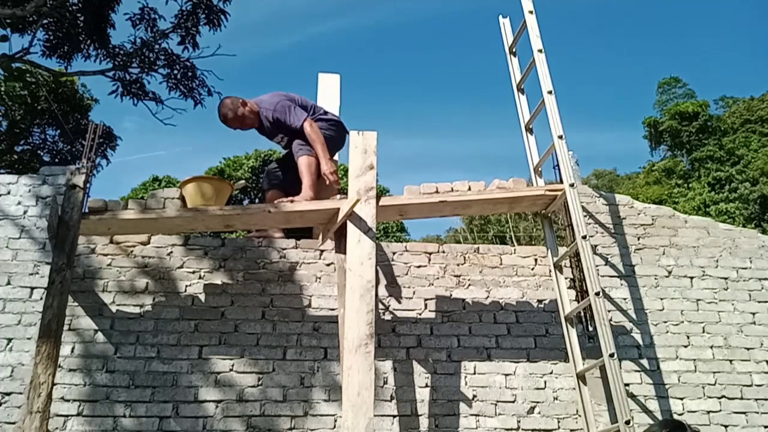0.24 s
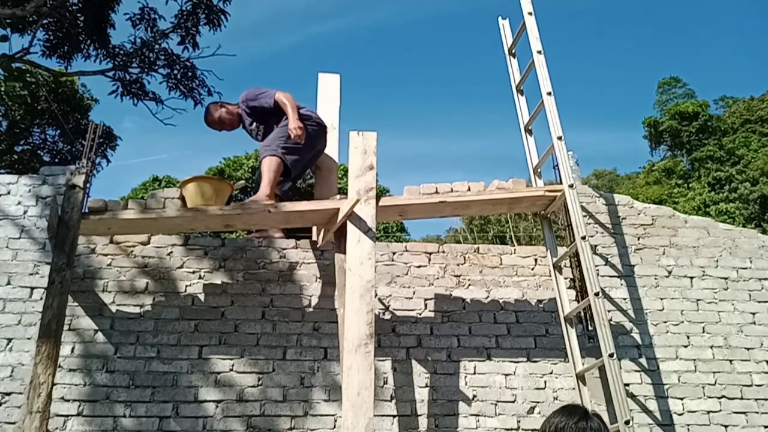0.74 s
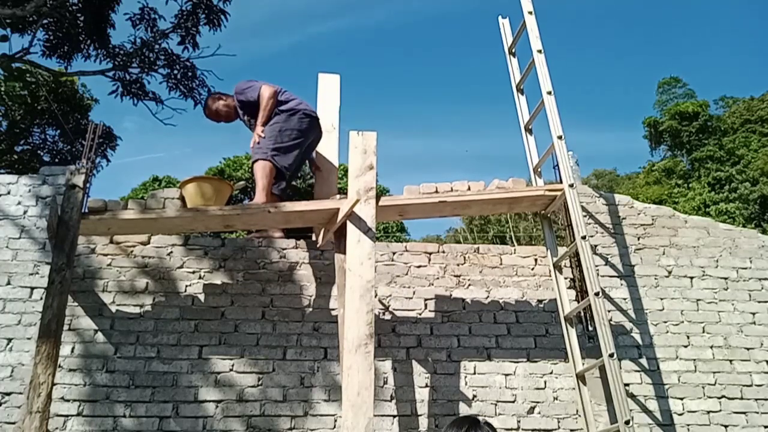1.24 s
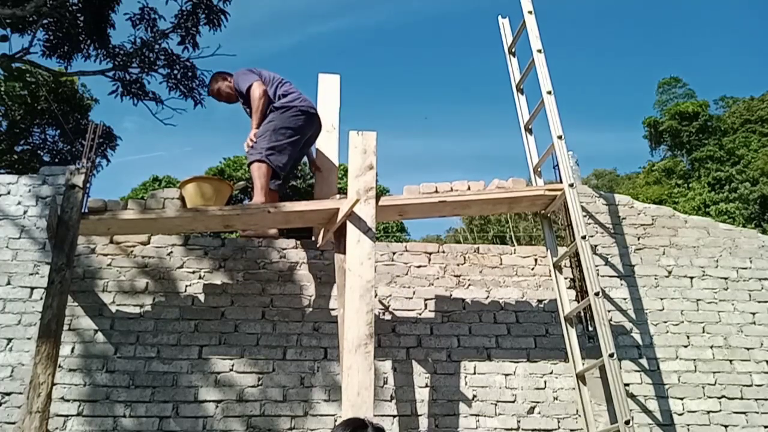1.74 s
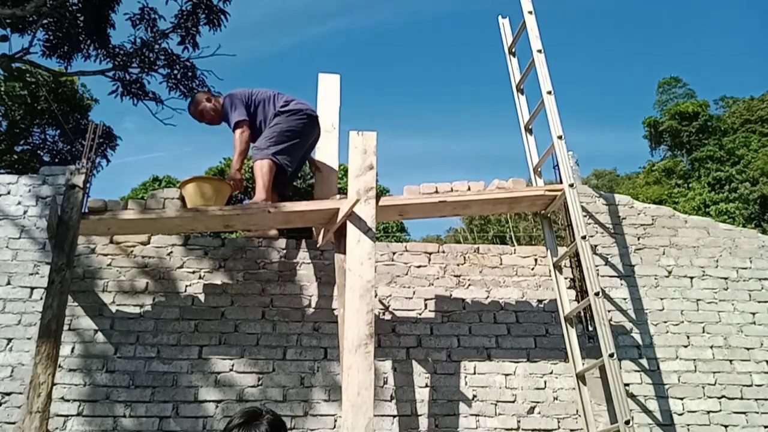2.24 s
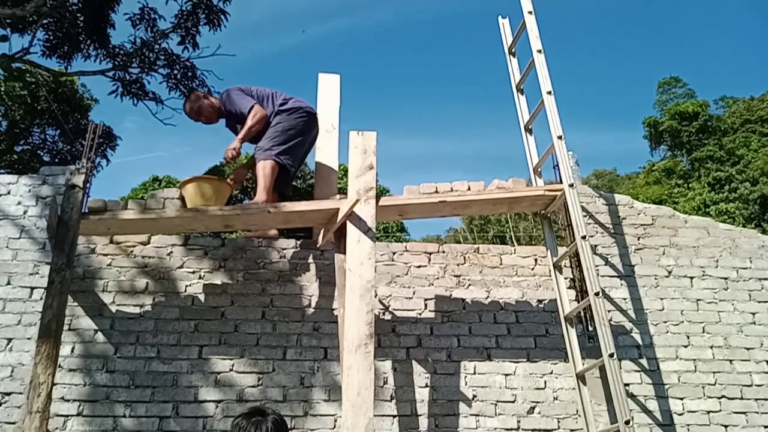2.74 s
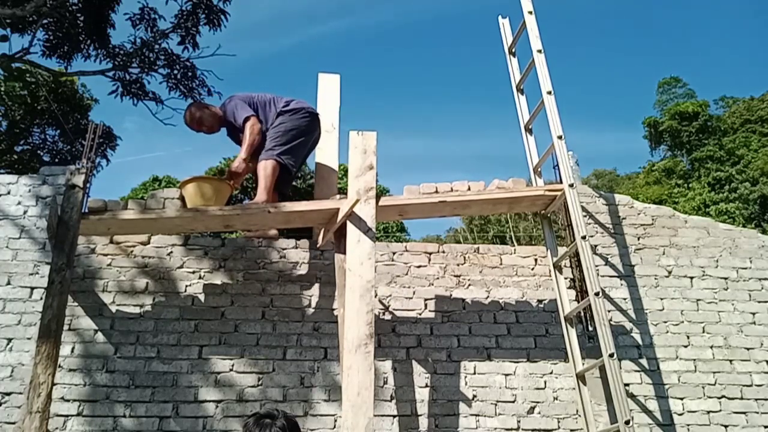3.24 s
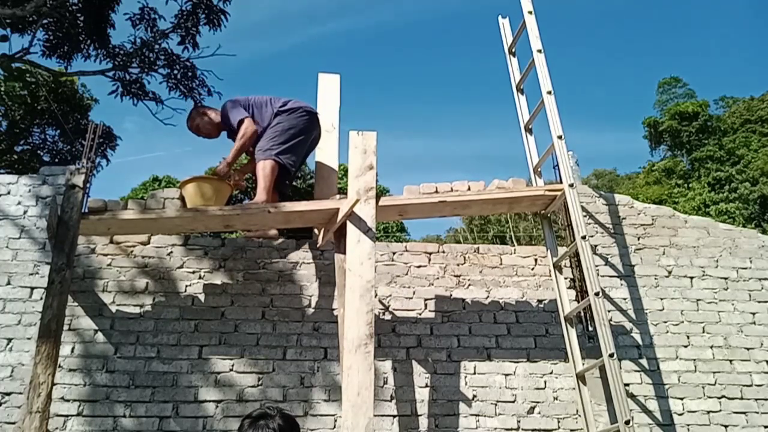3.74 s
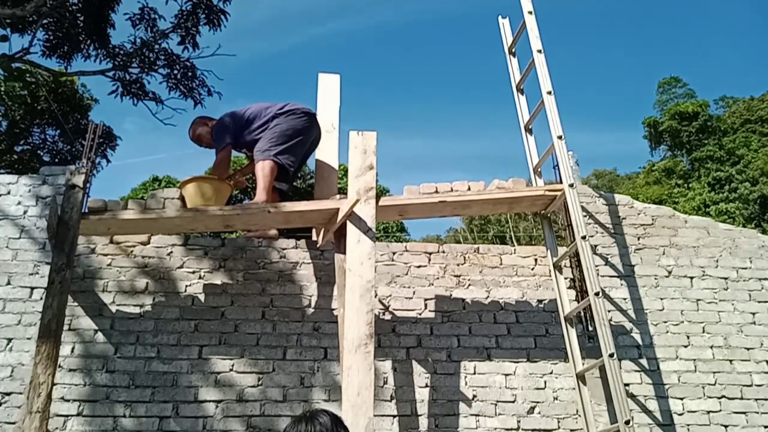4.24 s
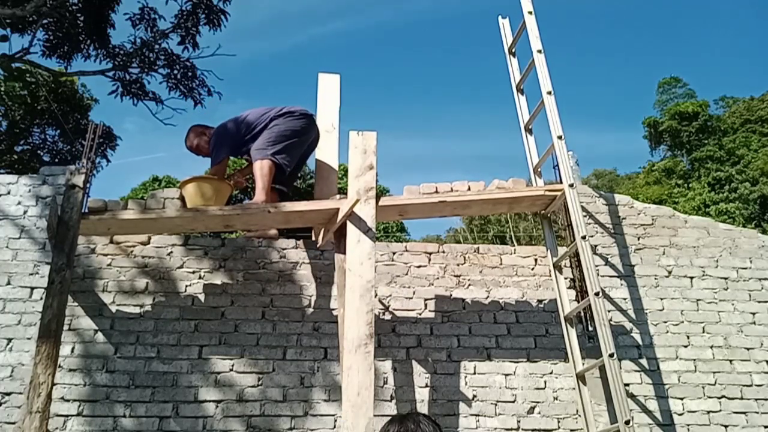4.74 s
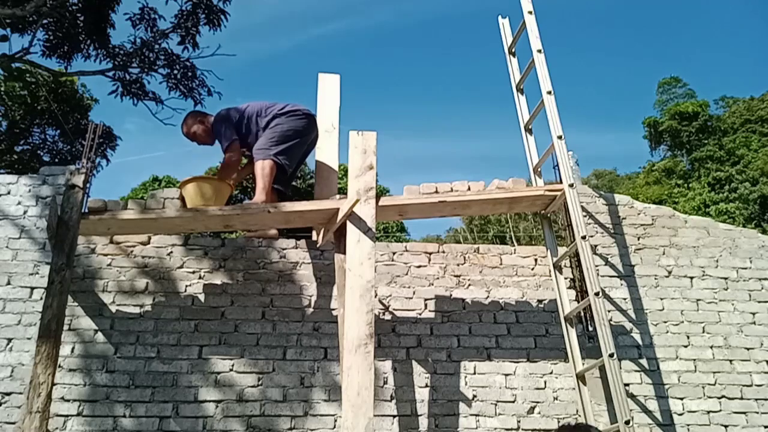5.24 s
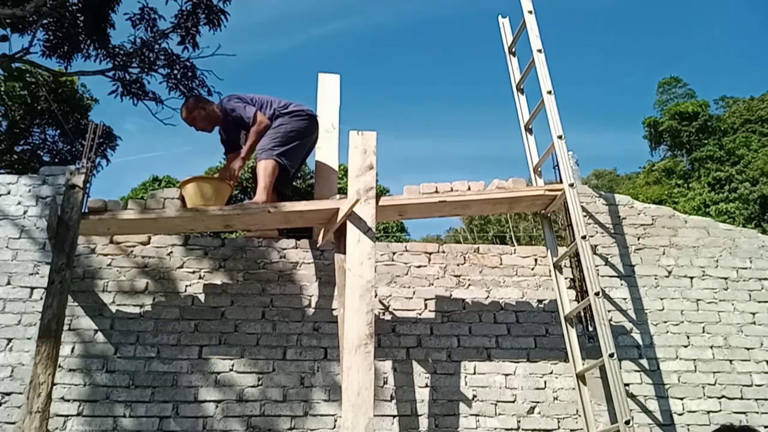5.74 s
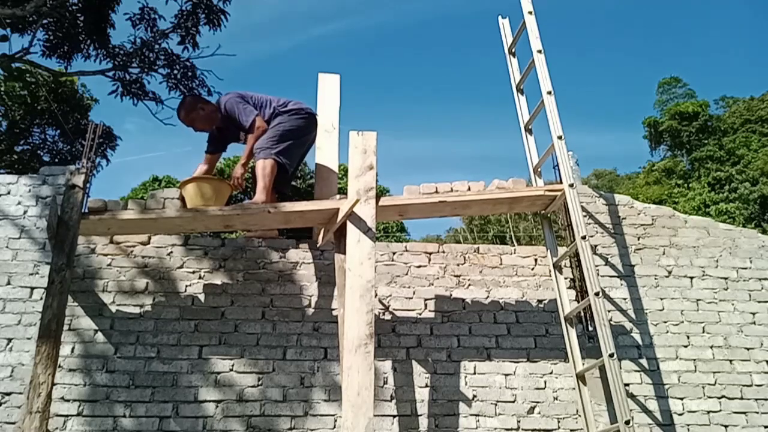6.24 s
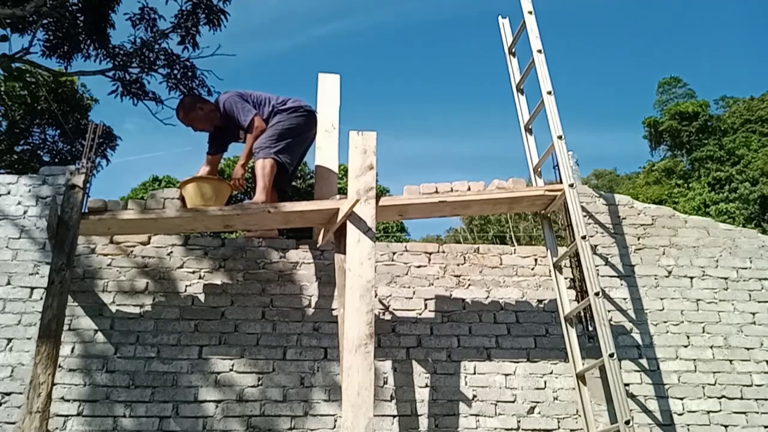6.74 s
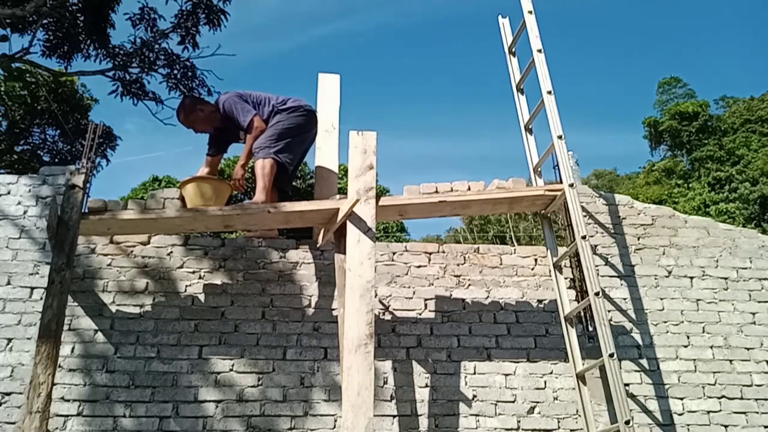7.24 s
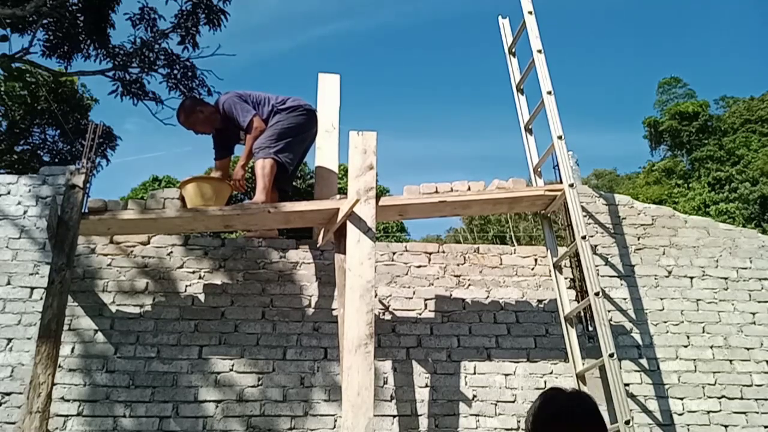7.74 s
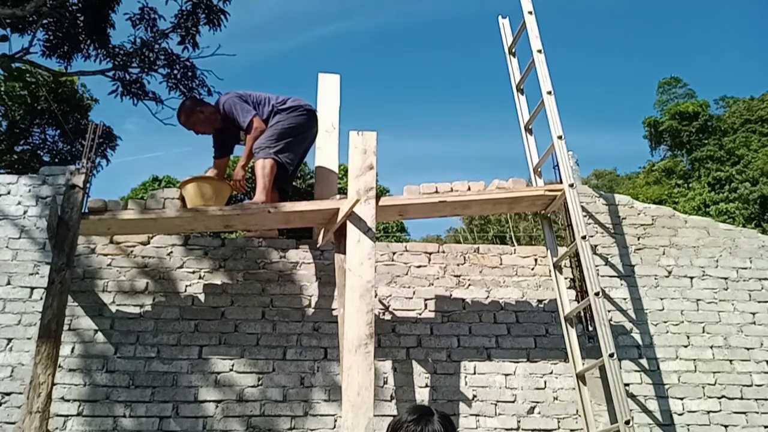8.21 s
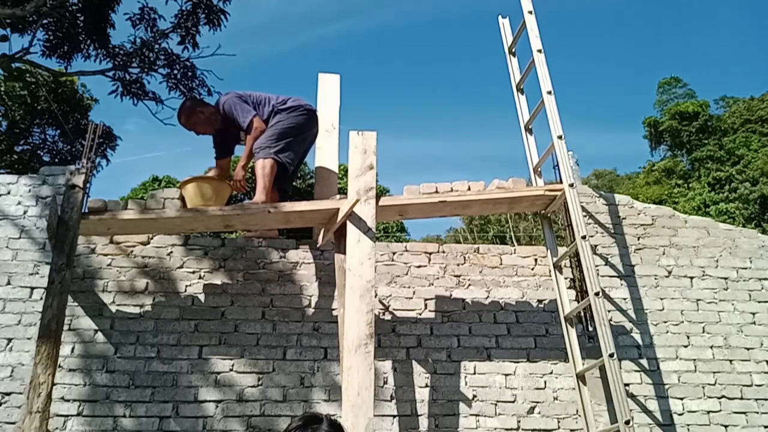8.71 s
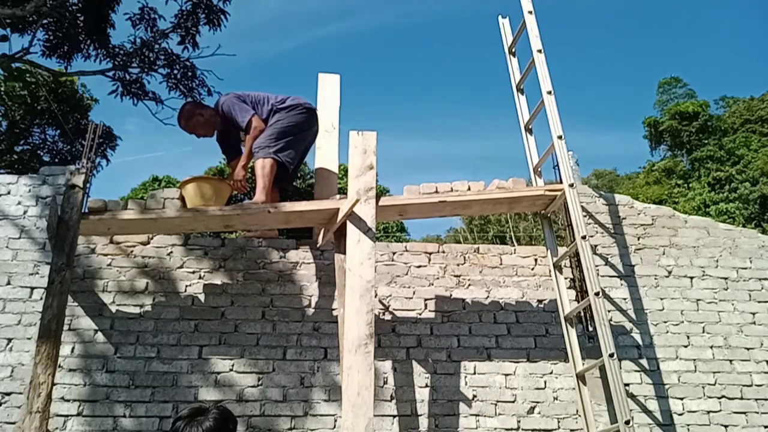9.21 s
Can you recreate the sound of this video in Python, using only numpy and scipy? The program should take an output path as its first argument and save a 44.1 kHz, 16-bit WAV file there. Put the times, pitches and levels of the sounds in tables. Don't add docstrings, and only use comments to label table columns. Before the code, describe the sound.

In an open walled yard, a brick is already landing on scaffold planks, followed by gritty trowel scrapes. Around two to four seconds come loud woody thuds, a dragged load and rattling rebounds. Afterwards smaller taps, clinks and rasping strokes continue to the end. Faint cicadas drone steadily above, with a few tiny bird chirps. Nearly mono small microphone, slightly boxy, short wall echo.

```python
import sys
import numpy as np
from scipy import signal
from scipy.io import wavfile
from scipy.ndimage import uniform_filter1d

SR = 44100
rng = np.random.default_rng(int(sys.argv[2]) if len(sys.argv) > 2 else 0)


def field_ratio(decibels):
    return 10 ** (np.asarray(decibels, dtype=float) / 20)


def dump_mix(stems):
    frames = np.atleast_2d(stems).T
    limited = np.clip(frames, -1, 1)
    pcm = np.round(limited * 32767).astype(np.int16)
    wavfile.write(sys.argv[1], SR, pcm)


N = 417627
T = np.arange(N) / SR

# f/Hz, density/dB per Hz
GRIT_SPECTRUM = [(500, -19), (900, -1), (1500, 1.5), (3000, 1), (4500, 0.5), (6000, 1), (8000, -24.5),
                 (11000, -60)]


def evened(x):
    return x / np.sqrt(np.mean(x ** 2) + 1e-20)


def read(points, hz):
    f, value = np.transpose(points)
    return np.interp(np.log(hz + 1), np.log(f + 1), value)


def level_db(points):
    return np.interp(T, *np.transpose(points))


def coloured(x, points):
    gain_db = read(points, abs(np.fft.fftfreq(4096, 1 / SR)))
    log_gain = np.log(field_ratio(np.maximum(gain_db, -100)))
    taps = np.fft.ifft(np.exp(np.conj(signal.hilbert(log_gain)))).real[:2048]
    return signal.oaconvolve(x, taps)[:len(x)]


def resonate(x, hz, width_hz):
    r = np.exp(-np.pi * width_hz / SR)
    pole = r * np.exp(2j * np.pi * hz / SR)
    return 2 * signal.lfilter([1 - r], [1, -pole], x).real


def drift(rate_hz):
    return evened(resonate(rng.standard_normal(N), 0, rate_hz))


def grains(count, spread_db):
    size_db = spread_db * np.minimum(rng.exponential(1, count), 5)
    return evened(rng.standard_normal(count) * field_ratio(size_db))


def whistle(hz, width_hz, firm=0):
    noise = rng.standard_normal((2, len(hz)))
    slow = resonate(resonate(noise, 0, width_hz), 0, width_hz)
    envelope = firm + evened(slow[0]) + 1j * evened(slow[1])
    carrier = np.exp(2j * np.pi * np.cumsum(hz) / SR)
    return evened((envelope * carrier).real)


def patchy(x, patchy_db):
    _, t, z = signal.stft(x, SR, nperseg=256)
    spots = uniform_filter1d(rng.standard_normal(z.shape), size=3, axis=0)
    spots = evened(uniform_filter1d(spots, size=12, axis=1))
    depth_db = np.interp(t, T, patchy_db * np.ones(N))
    return evened(signal.istft(z * field_ratio(depth_db * spots), SR, nperseg=256)[1][:N])


def add(mix, s, sound):
    at = round(s * SR)
    part = mix[max(at, 0):][:len(sound) + min(at, 0)]
    part += sound[max(-at, 0):][:len(part)]


def air():
    # f/Hz, density/dB per Hz
    hum_spectrum = [(24, -39.5), (40, -18), (49, 0), (108, 3), (1080, -11.5), (1270, -3.5), (1450, -17),
                    (4600, -15), (5720, -13), (10100, -120)]
    hum = patchy(coloured(rng.standard_normal(N), hum_spectrum), 3.1)
    return field_ratio(-71 + 2.3 * drift(2.0)) * hum


def cicadas():
    # f/Hz, density/dB per Hz
    chorus_spectrum = [(5800, -35), (6500, -28), (6850, -8), (7000, -2), (7400, 4.5), (7750, 0.5),
                       (8400, -7.5), (8850, -10.5), (9150, -26), (10800, -25), (11600, -33), (13800, -37),
                       (15000, -19.5), (15600, -23.5)]
    # t/s, level/dB
    chorus_db = [(0.0, -57.5), (2.5, -58.5), (2.74, -57.5), (3.61, -58), (3.72, -57), (5.25, -58),
                 (5.67, -57), (7.89, -58), (8.02, -57.5), (9.47, -57)]
    # t/s, lower line f/Hz, upper line f/Hz
    slider_hz = [(1.8, 4930, 5100), (2.6, 4945, 5105), (3.5, 5010, 5160), (4.5, 5050, 5188),
                 (5.0, 5066, 5196), (6.4, 5098, 5228), (7.1, 5107, 5237), (9.47, 5150, 5275)]
    # t/s, level/dB
    slider_db = [(1.7, -102), (1.9, -81), (2.6, -75.5), (3.5, -68), (4.5, -72.5), (5.5, -74.5), (7, -72),
                 (8, -74.5), (9.47, -72)]
    # f/Hz, level/dB
    steady_lines = [(5211, -10), (5352, 0), (5392, -2)]
    # t/s, level/dB
    steady_db = [(0, -72), (1.5, -71.5), (3, -73.5), (4.5, -70.5), (5.5, -72), (6.5, -72.5), (8, -78),
                 (9.47, -74.5)]
    noise = rng.standard_normal(N)
    chorus = field_ratio(level_db(chorus_db) + 1.0 * drift(5.7)) * evened(coloured(noise, chorus_spectrum))

    s, *lines = np.transpose(slider_hz)
    lower, upper = (whistle(np.interp(T, s, hz), 40, firm=.9) for hz in lines)
    throb = .35 * np.cos(2 * np.pi * (13 * T + .6 * drift(.4)))
    pair = lower * (1 + throb) + 1.5 * upper * (1 - throb)

    steady = sum(field_ratio(db) * evened(resonate(resonate(noise, hz, 30), hz, 90)) for hz, db in steady_lines)
    return chorus + field_ratio(level_db(slider_db)) * pair + field_ratio(level_db(steady_db)) * steady


def birds():
    # t/s, length/s, start f/Hz, end f/Hz, level/dB
    notes_sung = [
        (0.026, 0.027, 5950, 5900, -60),
        (0.86, 0.084, 3050, 3045, -65),
        (0.97, 0.1, 3055, 3040, -67),
        (1.386, 0.022, 5880, 5330, -58),
        (5.035, 0.095, 3005, 3020, -71),
        (5.12, 0.14, 3027, 3022, -65.5),
        (5.659, 0.023, 5850, 5730, -71),
        (6.075, 0.024, 5800, 5470, -59.5),
        (7.864, 0.11, 5240, 5520, -91),
        (8.79, 0.19, 5600, 5700, -77),
    ]
    mix = np.zeros(N)
    for s, length_s, start_hz, end_hz, db in notes_sung:
        u = np.linspace(0, 1, round(length_s * SR))
        hz = end_hz + (start_hz - end_hz) * (1 - u) ** 2
        clean = np.clip(length_s / .06 - .6, 0, .85)
        tone = np.sqrt(2) * np.sin(2 * np.pi * np.cumsum(hz) / SR)
        blurred = whistle(hz, 25 + 0.0019 / length_s ** 3)
        note = clean * tone + (1 - clean) * blurred
        add(mix, s, field_ratio(db) * note * signal.windows.tukey(len(u), .4))
    return mix


def yard(x):
    # f/Hz, t60/s
    decay_s = [(80, 0.98), (300, 0.49), (700, 0.28), (1300, 0.32), (3000, 0.24), (8000, 0.074)]
    hz, t, z = signal.stft(rng.standard_normal(SR), SR, nperseg=256)
    tail = signal.istft(z * field_ratio(-60 * t / read(decay_s, hz)[:, None]), SR, nperseg=256)[1]
    tail = np.concatenate([np.zeros(400), tail / np.linalg.norm(tail)])
    return signal.fftconvolve(x, tail)[:N]


def effort(rows):
    slope_db = 30
    t = T[::44]
    power = np.zeros(len(t))
    for s, db, press_s, *hold_s, lift_s in rows:
        before = np.maximum(s - t, 0) / press_s
        after = np.maximum(t - s - sum(hold_s), 0) / lift_s
        power += field_ratio(db - slope_db * (before + after)) ** 2
    return np.interp(T, t, power)


def work():
    # full pressure t/s, grit level/dB, press/s, hold/s, lift/s
    scrapes = [(.08, -53, 0.025, .001, 0.31), (.63, -64.5, 0.042, 0.078, 0.11),
               (.78, -69, 0.11, 0.35, 0.38), (1.228, -54, 0.02, 0.053, 0.22),
               (2.215, -48.5, 0.11, 0.071, 0.026), (2.44, -70.5, 0.02, 0.11, 0.11),
               (2.622, -52.5, 0.042, 0.1, .05), (2.732, -43.5, 0.24, 0.11, 0.19),
               (3.412, -65, 0.16, 0.17, 0.018), (4.623, -64.5, 0.045, 0.14, .05),
               (7.385, -51.5, 0.034, 0.074, 0.047), (8.71, -53, 0.034, 0.01, 0.11)]
    # full pressure t/s, grit level/dB, press/s, lift/s
    unheld_strokes = [(1.99, -65.5, 0.17, 0.12), (3.169, -58, 0.15, 0.74), (3.76, -56.5, 0.022, 0.12),
                      (3.875, -59, 0.16, 0.053), (4.0, -55.5, 0.02, 0.27), (4.198, -65, 0.22, .3),
                      (4.341, -56, 0.116, 0.1), (4.448, -68.5, 0.34, 0.13), (4.585, -64, 0.023, 0.065),
                      (4.835, -64, 0.043, 0.1), (4.989, -71.5, 0.148, 0.27), (5.135, -60.5, 0.066, 0.33),
                      (5.346, -59.5, 0.008, 0.065), (5.92, -51.5, 0.17, 0.095), (6.321, -65.5, 0.39, 0.12),
                      (6.778, -56, 0.094, 0.13), (7.36, -71.5, 0.79, .05), (7.79, -57, 0.058, 0.11),
                      (8.075, -51.5, 0.06, 0.17), (8.192, -44.5, 0.016, 0.087), (8.36, -50, .05, 0.21),
                      (9.465, -62, 0.3, 0.11)]
    # full pressure t/s, grit level/dB, press/s, hold/s, lift/s
    sweeps = [
        (1.675, -46.5, 0.026, 0.049, 0.11),
        (5.52, -57, .04, 0.043, 0.204),
        (5.78, -53.5, 0.022, 0.058, 0.31),
        (6.63, -63.5, 0.37, .11, 0.14),
        (6.89, -61, 0.092, .001, 0.17),
        (8.272, -51, 0.07, .001, 0.17),
        (8.44, -64.5, .1, 0.029, 0.28),
        (8.974, -69.5, 0.21, 0.17, .1),
        (9.226, -59.5, .18, .001, 0.24),
    ]
    # t/s, rumble level/dB, build-up/s, settling/s
    shakes = [(.06, -34, 0.029, 0.16), (.68, -60, 0.12, 0.2), (1.06, -65, 1, 0.22), (1.36, -51, 0.21, 0.12),
              (1.68, -62, 0.04, 1), (2.44, -38.5, 0.022, 0.17), (2.986, -43.5, 0.019, 0.11),
              (3.76, -32, 0.026, 0.1), (3.88, -39, 0.33, 0.6), (4.34, -72, 0.32, 0.26),
              (4.59, -48, 0.015, 0.35), (4.835, -44, 0.013, 0.093), (5.025, -52, 0.024, 0.16),
              (5.34, -50.5, 0.015, 0.35), (5.92, -43, 0.064, 0.09), (6.32, -58, 0.23, 0.2),
              (6.8, -53.5, 0.068, 0.16), (7.56, -72, .02, 0.12), (8.19, -48, 0.012, 0.14),
              (8.268, -43, 0.078, 0.1), (8.378, -41.5, 0.044, 0.14), (8.76, -49.5, 0.14, 0.098),
              (9.052, -67.5, 0.16, 0.19)]
    # t/s, rumble level/dB, build-up/s, hold/s, settling/s
    drags = [
        (2.691, -31.5, 0.16, .15, .14),
    ]
    # f/Hz, density/dB per Hz
    sand_spectrum = [(6000, -42.5), (8000, 3.5), (10000, 0), (13000, -8), (14200, -8), (15500, 1)]
    # f/Hz, density/dB per Hz
    timber_spectrum = [(60, -23), (100, -5.5), (200, -7.5), (300, -2), (500, -2.5), (750, -2), (1200, -6.5),
                       (1800, -28), (5000, -65.5)]
    # f/Hz, gain/dB
    wet_dull = [(1000, 1), (3500, 1), (4500, -4.5), (6500, -5), (8000, -3.5)]
    wet_sand_db, dry_sand_db, stroke_shake_db = -42, -14, -5.5
    smear = 0.64
    idle_grit_db, idle_sand_db, idle_rumble_db = -85.5, -90, -86

    wet, dry_strokes, loads = effort(scrapes + unheld_strokes), effort(sweeps), effort(shakes + drags)
    grit_power = wet + dry_strokes + field_ratio(2 * idle_grit_db)
    sand_power = field_ratio(2 * wet_sand_db) * wet ** smear + field_ratio(2 * dry_sand_db) * dry_strokes
    timber_power = loads + field_ratio(2 * stroke_shake_db) * (wet + dry_strokes)
    grit_db = 10 * np.log10(grit_power)
    sand_db = 10 * np.log10(sand_power + field_ratio(2 * idle_sand_db))
    timber_db = 10 * np.log10(timber_power + field_ratio(2 * idle_rumble_db))

    stones = (rng.random(N) < 120 / SR) * rng.standard_normal(N)
    crunch = grains(N, spread_db=2.5) * field_ratio(2.2 * drift(27)) + 0.11 * evened(stones)
    uneven_db = np.clip(.22 * (-42 - grit_db), 2.5, 4.5)
    grit = field_ratio(grit_db + 1.5) * patchy(coloured(crunch, GRIT_SPECTRUM), uneven_db)
    wetness = wet / grit_power
    grit = wetness * coloured(grit, wet_dull) + (1 - wetness) * grit
    sand = field_ratio(sand_db + 7.5) * evened(coloured(crunch, sand_spectrum))

    shaken = coloured(grains(N, spread_db=4.5), timber_spectrum)
    modes = resonate(shaken, 298.7, 30) + 1.2 * resonate(shaken, 649, 80)
    boards = evened(shaken) + 0.25 * evened(modes)
    sway = evened(resonate(shaken, 81, 50)) * field_ratio(1.8 * (timber_db + 30.5) - 45.5)
    return grit + sand + sway + field_ratio(timber_db - 7.5) * evened(boards)


def rubs(mix):
    # middle t/s, peak level/dB, band f/Hz, length/s
    rub_events = [(.035, -19.5, 534, 0.027), (0.125, -47, 1600, .07), (0.617, -55, 4340, 0.055),
                  (0.698, -54, 940, 0.047), (0.981, -49, 970, 0.033), (1.29, -52, 1240, 0.1),
                  (1.693, -45.5, 342, 0.054), (1.746, -43, 1330, 0.048), (2.256, -52, 1270, 0.062),
                  (2.332, -31.5, 3200, 0.028), (2.362, -45, 3360, .06), (2.742, -35, 304, 0.094),
                  (2.759, -36.5, 1290, 0.062), (2.831, -37.5, 1255, 0.074), (2.836, -42, 5370, .015),
                  (2.834, -35, 740, 0.074), (3.015, -45.5, 650, 0.05), (3.178, -47, 2800, 0.0091),
                  (3.192, -49, 3000, 0.024), (3.378, -47.5, 5630, .03), (3.521, -52.5, 2640, 0.0089),
                  (3.545, -51.5, 970, 0.038), (4.59, -36.5, 1220, 0.016), (4.582, -47.5, 2600, 0.016),
                  (4.583, -45, 1940, 0.017), (4.697, -50, 1245, 0.033), (4.677, -63, 2420, 0.014),
                  (4.836, -55.5, 3280, 0.048), (5.135, -50, 1274, 0.032), (5.158, -51, 1700, 0.029),
                  (5.35, -45, 3700, 0.015), (5.52, -44.5, 1740, 0.025), (5.553, -53, 2800, 0.018),
                  (5.778, -47, 2850, 0.021), (5.794, -42.5, 2590, .015), (5.803, -40, 5640, 0.048),
                  (5.84, -42, 5100, 0.014), (6.659, -51, 3200, 0.045), (6.705, -56.5, 1270, .05),
                  (6.773, -52, 2800, 0.027), (6.776, -46, 5860, .025), (6.88, -48, 3740, 0.033),
                  (7.43, -42.5, 1060, 0.027), (7.432, -47, 2630, 0.023), (7.767, -56.5, 1630, .03),
                  (7.984, -55, 1620, 0.045), (8.089, -44.5, 1270, 0.044), (8.188, -39, 2750, .015),
                  (8.189, -38, 1990, 0.023), (8.394, -41.5, 1140, 0.03),
                  (.052, -28, 620, 0.019), (.2, -42.5, 660, .15), (2.35, -26.5, 270, 0.037),
                 (2.71, -30.5, 400, 0.036), (3.692, -23, 1260, .012), (3.78, -26.5, 290, 0.047),
                 (3.915, -20, 710, 0.027), (4.6, -35, 448, 0.027), (4.63, -42, 380, 0.021),
                 (4.84, -44, 1000, 0.023), (4.85, -51, 500, 0.024), (4.96, -58, 3900, .03),
                 (4.72, -54, 2800, .08), (5.01, -53, 3060, 0.015), (5.2, -59.5, 2540, .1),
                 (5.35, -49, 800, 0.023), (5.84, -38, 3540, .003), (5.901, -34, 1600, 0.0027),
                 (3.683, -39, 4600, 0.012), (1.79, -49, 140, 0.15), (5.07, -53, 400, 0.041),
                 (8.851, -53, 3000, .008), (0.26, -54, 4800, 0.072), (9.055, -56.5, 562, 0.065),
                 (9.045, -57, 1330, 0.037), (9.4, -53.5, 1400, 0.038), (9.39, -59, 2260, 0.032),
                 (8.272, -45, 300, 0.04), (8.09, -50, 3760, 0.053), (6.02, -56.5, 2250, 0.044),
                 (9.25, -59, 280, 0.13), (3.655, -33, 2700, 0.065), (3.74, -41, 2900, .08),
                 (2.7, -28.5, 550, .03), (0.15, -56, 3300, 0.087), (2.73, -30, 300, 0.04)]
    share = 0.099
    t = np.arange(-.12, .12, 1 / SR)
    for s, peak_db, hz, length_s in rub_events:
        band = resonate(grains(len(t), spread_db=2.0), hz, 2 * share * hz)
        band = resonate(band, hz, share * hz + 40)
        add(mix, s + t[0], field_ratio(peak_db - 11.0) * evened(band) * np.exp(-(2 * t / length_s) ** 2))


def snaps(mix):
    # t/s, peak level/dB, ring f/Hz, t60/s
    contacts = [(1.2368, -46, 2480, .02), (2.3283, -28, 1570, .02), (2.338, -21, 298.6, .22),
                (2.692, -36, 620, .05), (2.705, -30, 300, .15), (2.982, -42, 418, .04),
                (3.1765, -49, 4890, .012), (3.6418, -26, 1520, .02), (3.738, -29, 1300, 0.027),
                (3.8751, -45.5, 4660, .015), (4.576, -41, 1224, .025), (4.587, -35.5, 528, 0.066),
                (4.835, -49, 1290, 0.037), (5.3423, -36, 1550, .008), (5.84, -42, 4200, .006),
                (5.9011, -39, 2010, .008), (5.925, -43, 790, 0.026), (6.3068, -47, 4030, .012),
                (6.655, -48, 2610, .01), (6.752, -50.5, 4900, 0.022), (7.3843, -52, 3170, 0.013),
                (8.186, -33, 2400, .008), (8.188, -39, 1040, 0.032), (8.373, -44, 538, 0.069),
                (8.392, -38, 554, 0.07), (8.7496, -33, 1700, .005)]
    t = np.arange(SR // 8) / SR
    for s, peak_db, hz, t60_s in contacts:
        overtone = .4 * np.sin(2 * np.pi * 1.63 * hz * t) * field_ratio(-60 * t / t60_s)
        ring = np.sin(2 * np.pi * hz * t) + overtone
        swell = np.minimum(t * hz, 1)
        add(mix, s, field_ratio(peak_db - 60 * t / t60_s) * ring * swell)


def tap(row, wood_db, steel_db):
    # f/Hz, density/dB per Hz
    knock_spectrum = [(70, -19.5), (150, -16.5), (400, 0.5), (1200, 1), (1800, -10.5), (3000, -35.5),
                      (8000, -77.5)]
    # f/Hz, width/Hz, level/dB
    blade_modes = [(1940, 160, 4.5), (2800, 150, -3.5), (3740, 200, 2.5)]
    s, peak_db, hz, t60_s = row
    t = np.arange(SR // 4) / SR
    contact = np.minimum(t / .001, 1) * (1 + .8 * np.exp(-t / .004))
    blow = grains(len(t), spread_db=2.5) * field_ratio(-60 * t / t60_s) * contact
    tick = coloured(blow * field_ratio(-60 * t / .12), GRIT_SPECTRUM)
    detune = rng.uniform(.93, 1.07, len(blade_modes))
    blade = sum(field_ratio(db) * evened(resonate(tick, f * k, width))
                for (f, width, db), k in zip(blade_modes, detune))
    ring = evened(resonate(resonate(blow, hz, .5 * hz), hz, 0.037 * hz + 45))
    knock = evened(coloured(blow, knock_spectrum))
    steel = .5 * evened(blade) + 0.64 * evened(tick)
    sound = 2.2 * ring + field_ratio(steel_db + 7.5) * steel + field_ratio(wood_db + 3.5) * knock
    return s, field_ratio(peak_db) * sound / abs(sound).max()


def taps(mix):
    # t/s, peak level/dB, ring f/Hz, t60/s
    bumps = [
        (4.58, -35.5, 505, 0.16),
        (5.34, -40.5, 905, 0.09),
    ]
    # t/s, peak level/dB, ring f/Hz, t60/s
    knocks = [
        (1.35, -46, 290, 0.14),
        (2.703, -25, 406, 0.077),
        (2.982, -46, 385, 0.038),
        (5.122, -54.5, 3020, 0.043),
        (5.927, -46, 410, 0.03),
        (7.38, -46.5, 3130, 0.1),
        (9.036, -50.5, 560, 0.13),
    ]
    # t/s, peak level/dB, ring f/Hz, t60/s
    clinks = [(1.708, -38, 270, 0.13), (1.729, -35.5, 345, 0.055), (3.401, -45.5, 3200, 0.14),
              (4.335, -49.5, 3140, 0.04), (5.011, -53.5, 1239, .093), (5.839, -49.5, 1270, .08),
              (5.898, -43.5, 2570, 0.067), (6.307, -53.5, 1227, 0.14), (6.748, -48, 3150, 0.05),
              (6.872, -47, 3160, .06), (7.782, -48, 1680, 0.32), (8.055, -54, 1260, 0.26),
              (8.19, -38, 1290, 0.07), (8.707, -46.5, 3610, 0.07), (5.342, -45, 1540, 0.02),
              (5.9, -41.5, 1510, 0.025), (8.751, -39, 2212, 0.015), (8.272, -41, 3040, .03)]
    # t/s, peak level/dB, ring f/Hz, t60/s
    tocks = [
        (.973, -55.5, 1270, 0.17),
        (3.238, -52.5, 1290, 0.082),
        (4.827, -46, 1157, 0.093),
        (6.922, -51, 278, 0.11),
        (6.955, -50.5, 302, 0.089),
        (7.564, -50.5, 290, 0.06),
        (8.267, -47, 1260, 0.025),
        (8.371, -38, 533, 0.083),
        (8.387, -40, 540, 0.073),
    ]
    # wood/dB, steel/dB against the ring
    for rows, wood_db, steel_db in [(bumps, 15, -29.5), (knocks, -1.5, -20),
                                    (clinks, -14.5, -2.5), (tocks, -13.5, -18)]:
        for row in rows:
            add(mix, *tap(row, wood_db, steel_db))


def thud(row, modes):
    # t/s, level/dB against the rattle
    contacts = [(.006, 3), (.033, 9.5), (0.05, 10), (.062, -2.5), (2.327, 5), (2.344, 0), (2.352, 6.5),
                (2.367, 5), (2.376, 7.5), (2.394, 1), (3.615, 2.5), (3.636, 1), (3.65, 0), (3.664, 1.5),
                (3.687, 3.5), (3.711, 3.5), (3.727, 3), (3.79, 3), (3.89, 4), (3.903, 0), (3.913, 7),
                (3.921, 8), (3.93, 5.5), (3.944, -2.5), (3.958, -3)]
    # f/Hz, density/dB per Hz
    crash_spectrum = [(45, -31), (80, -15), (200, -13.5), (400, -9), (800, -10), (1280, -9.5),
                      (1600, -16.5), (3300, -29.5), (6500, -39), (10000, -52.5), (15500, -60.5)]
    contact_s = .005
    s, peak_db, rise_s, t60_s = row
    t = np.arange(SR) / SR
    push = np.minimum(t / rise_s, 1) ** 1.2 * field_ratio(-60 * np.maximum(t - rise_s, 0) / t60_s)
    push *= 1 + sum(field_ratio(db) * np.exp(-((s + t - at) / contact_s - .5) ** 2) for at, db in contacts)
    crash = coloured(grains(SR, spread_db=3.0) * push, crash_spectrum)
    rings = sum(field_ratio(db) * evened(resonate(crash, hz, width)) for hz, width, db in modes)
    sound = evened(crash) + 2.03 * evened(rings)
    return s, field_ratio(peak_db) * sound / abs(sound).max()


def bricks(mix):
    # t/s, peak level/dB, build-up/s, settling t60/s
    landings = [
        (-0.008, -14.5, 0.0013, 0.15),
        (2.311, -12, 0.016, 0.24),
        (3.602, -10.5, 0.06, 0.23),
        (3.887, -14, .012, 0.22),
        (7.555, -56.5, 0.0059, 0.14),
    ]
    # f/Hz, width/Hz, level/dB
    planks = [
        [(274.4, 22, -4), (385, 24, -14), (665.5, 42, 3), (537, 51, -5), (334, 54, -10.5), (778, 40, -24.5),
         (985, 34, -5), (1290, 55, -14.5), (1590, 20, -9)],
        [(90, 28, -3.5), (164, 22, -11.5), (299.6, 45, -2), (384, 30, -12), (546, 40, -9.5), (654.6, 25, 2.5),
         (693, 26, -2), (1227, 89, -3)],
        [(92, 50, -5), (163, 36, -17), (290, 42, 3.5), (390, 43, -13), (560, 66, -7), (668.5, 40, -3),
         (726, 41, -1), (965, 35, -3.5), (1200, 90, -8)],
        [(99.8, 64, -4.5), (285.7, 23.4, 1.5), (533, 64, 1.5), (654, 15, -4.5), (940, 45, -15.5),
         (1130, 60, -14), (1500, 200, -16)],
        [(92.7, 33, 14), (170, 44, 7.5), (290, 36, -8.5)],
    ]
    for row, modes in zip(landings, planks):
        add(mix, *thud(row, modes))


def scene():
    far, song, scrape = air() + cicadas(), birds(), work()
    hits = np.zeros(N)
    for source in (rubs, snaps, taps, bricks):
        source(hits)
    echo = yard(field_ratio(-9.5) * hits + field_ratio(-12.5) * scrape + field_ratio(-7) * song)
    mono = hits + scrape + song + echo + far
    return np.array([mono, mono])


def low_pass(x):
    return signal.sosfilt(signal.butter(12, 15500, fs=SR, output="sos"), x)


def record(dry):
    # f/Hz, density/dB per Hz
    side_spectrum = [(40, -15.5), (138, -8), (980, -12.5), (1260, -4.5), (1500, -12), (3100, -13),
                     (4500, -18.5), (8000, -35), (12000, -24), (15500, -30)]
    hiss_db, side_db, side_hiss_db = -100, -52.5, -77
    mid = signal.sosfilt(signal.butter(2, 60, "high", fs=SR, output="sos"), dry.mean(0))
    mid = mid + 1.0 * resonate(mid, 1252, 61) + field_ratio(hiss_db) * rng.standard_normal(N)
    side_hiss = evened(coloured(rng.standard_normal(N), side_spectrum))
    side = field_ratio(side_db) * np.roll(mid, 300) + field_ratio(side_hiss_db) * side_hiss
    return low_pass(np.array([mid + side, mid - side]))


dry = scene()
out = record(dry)
dump_mix(out)
```